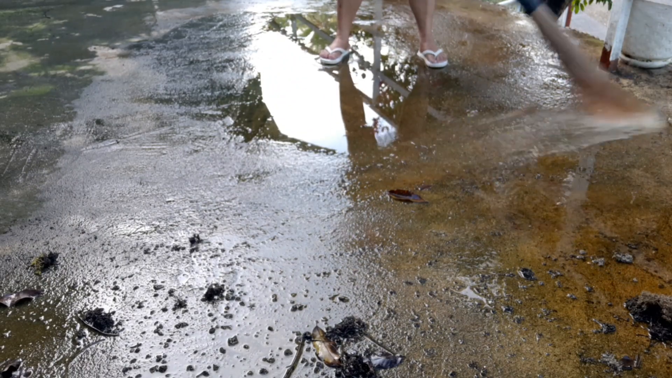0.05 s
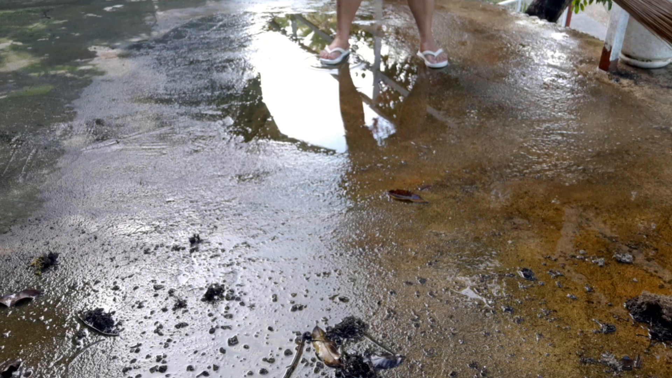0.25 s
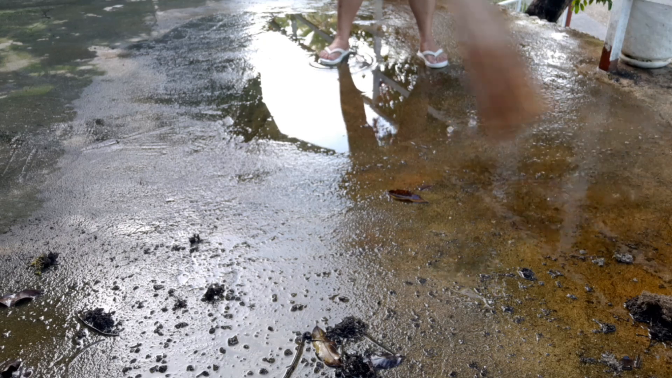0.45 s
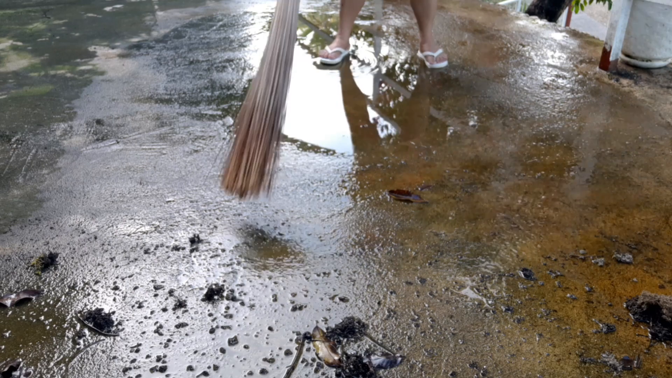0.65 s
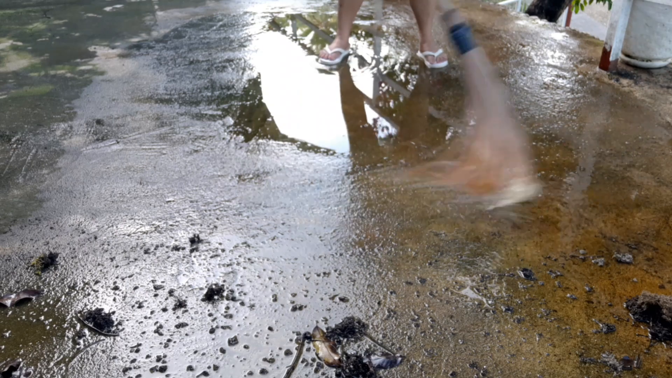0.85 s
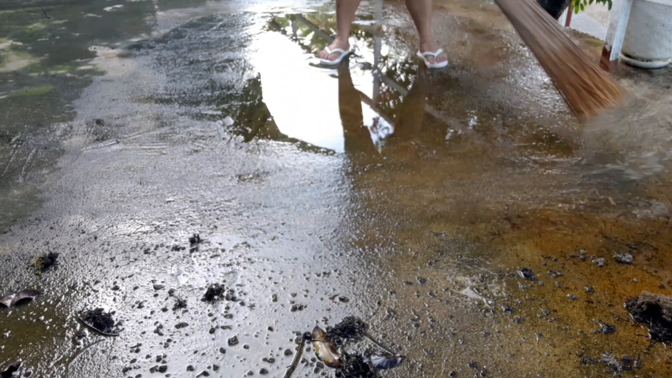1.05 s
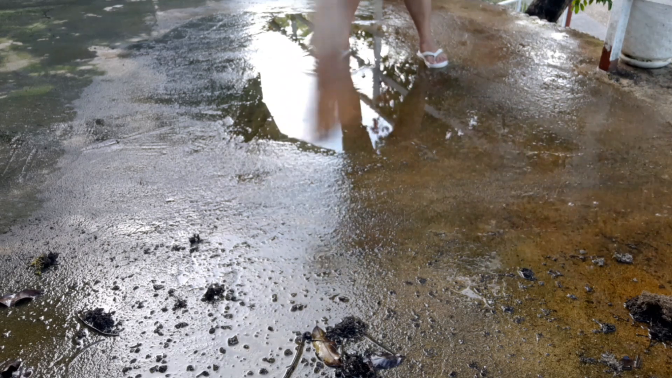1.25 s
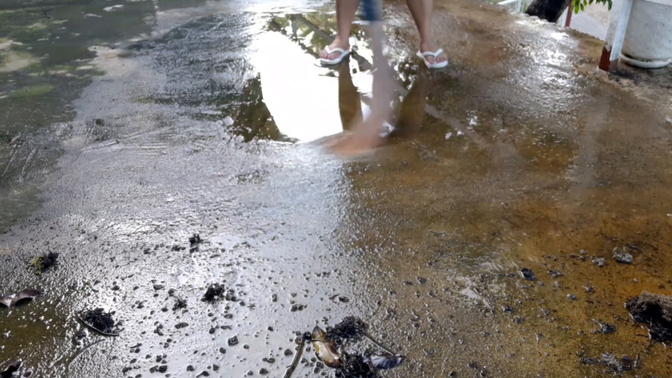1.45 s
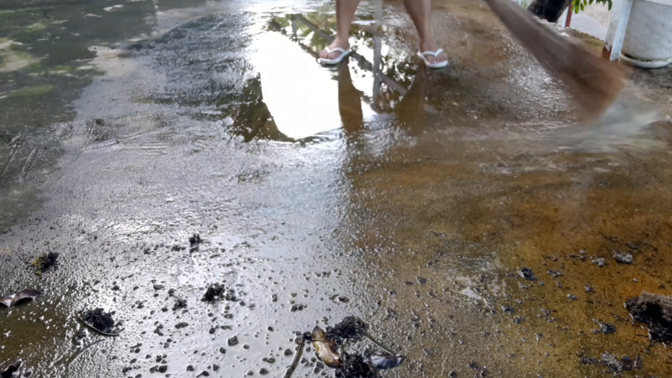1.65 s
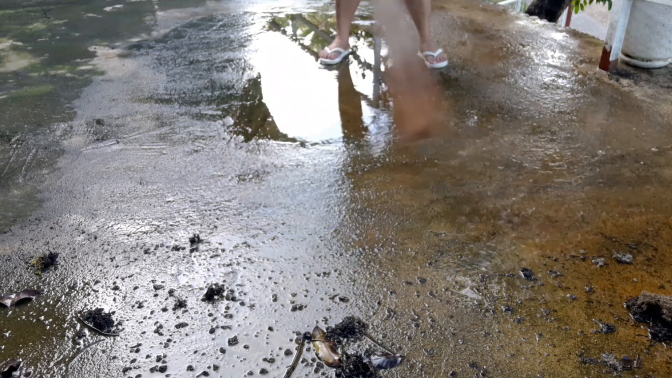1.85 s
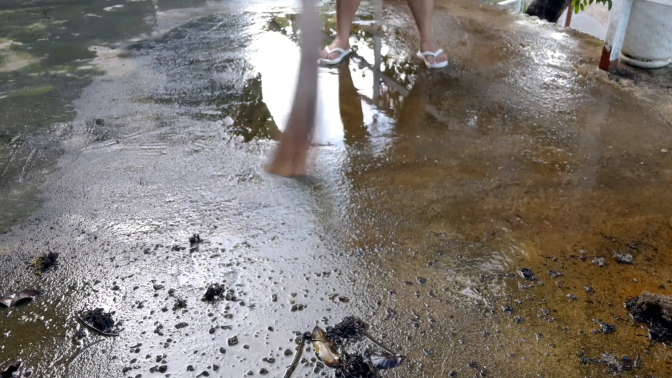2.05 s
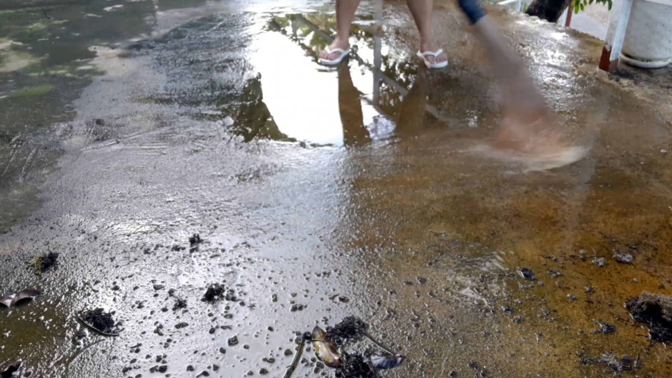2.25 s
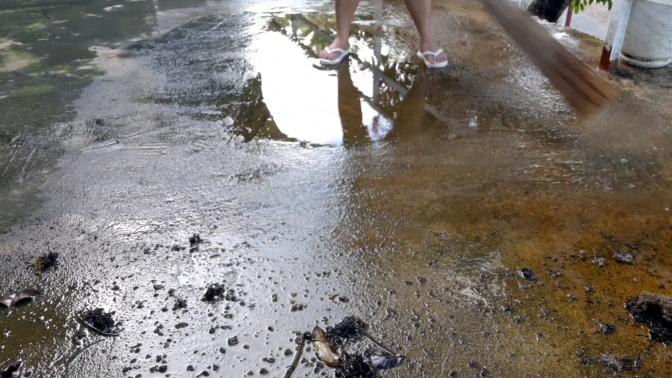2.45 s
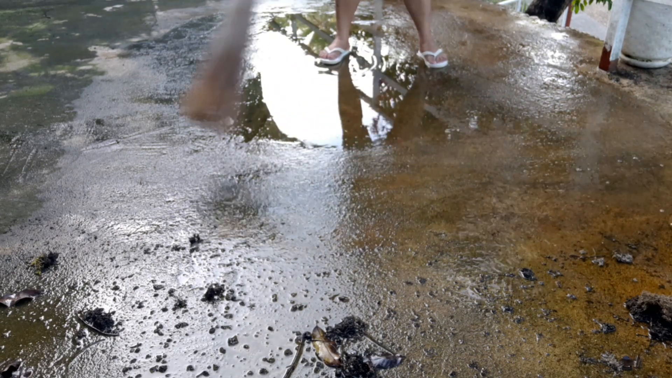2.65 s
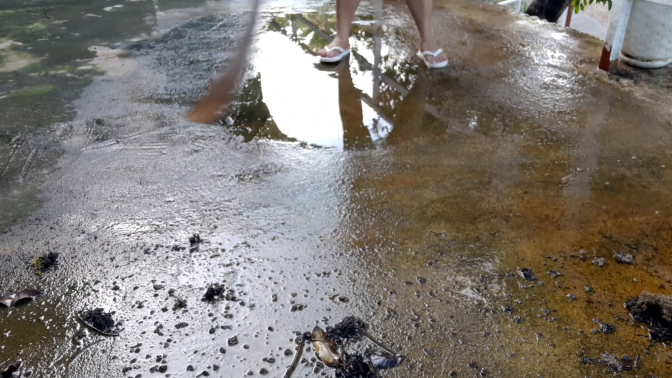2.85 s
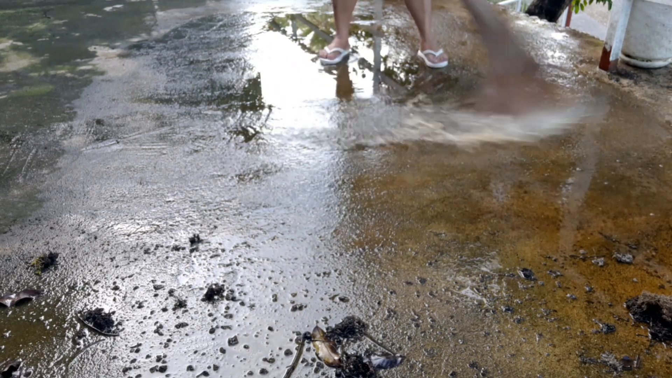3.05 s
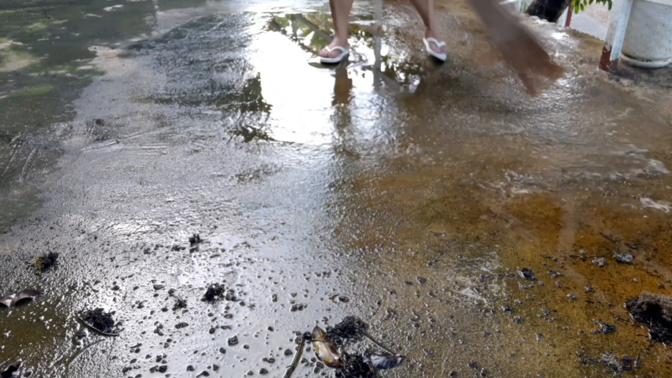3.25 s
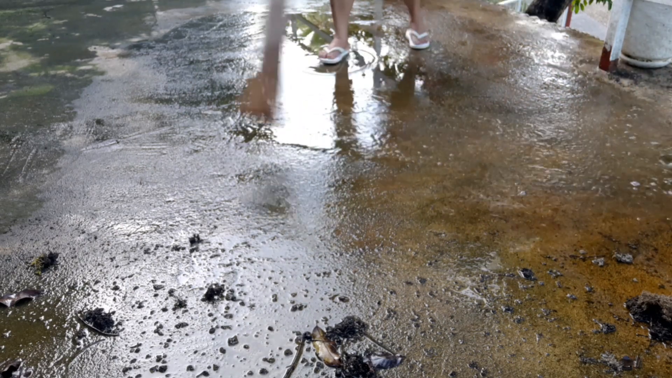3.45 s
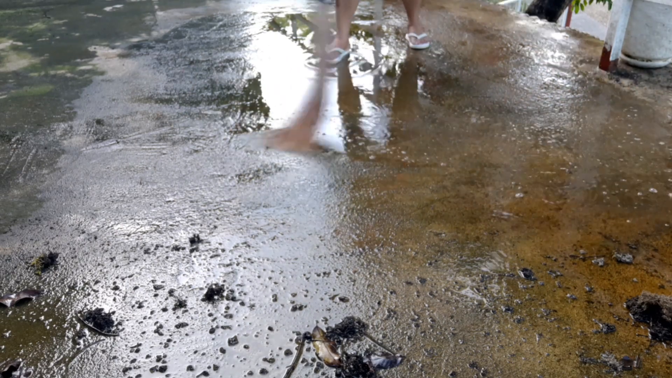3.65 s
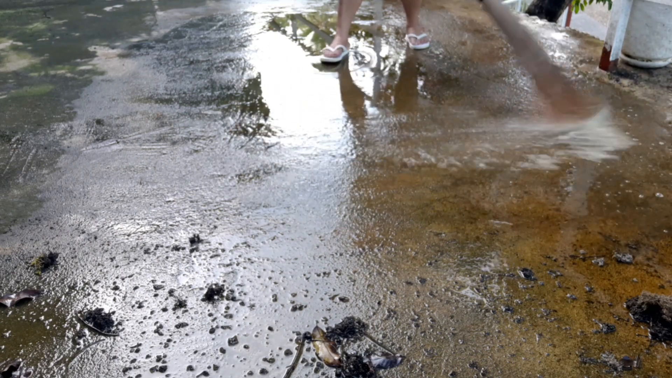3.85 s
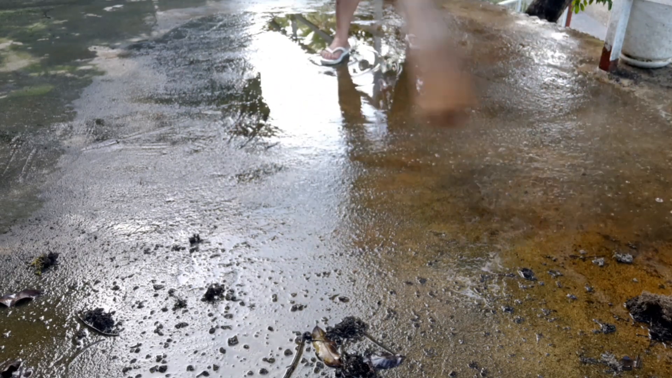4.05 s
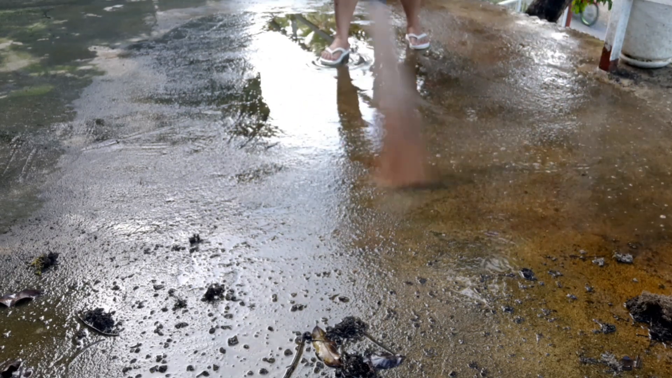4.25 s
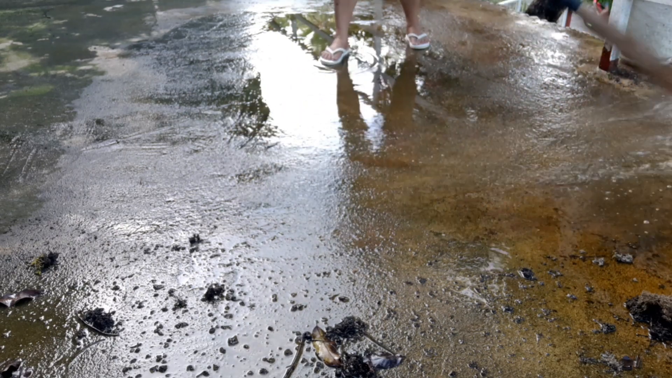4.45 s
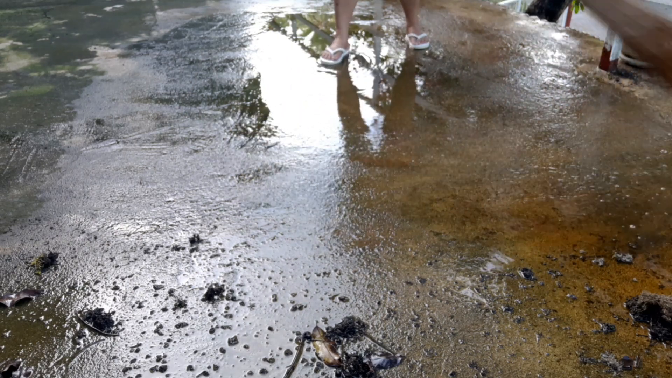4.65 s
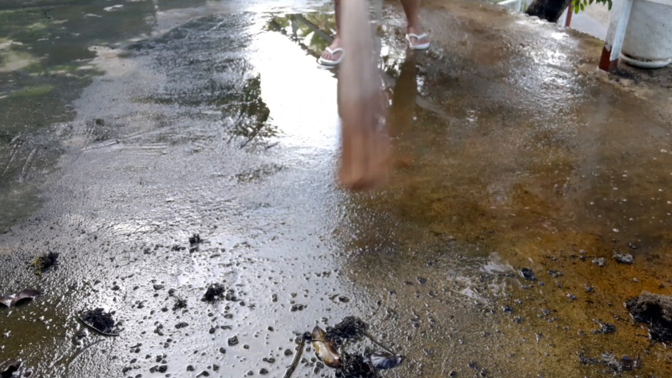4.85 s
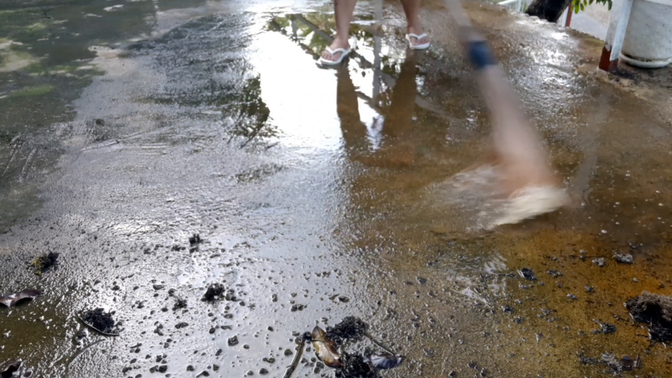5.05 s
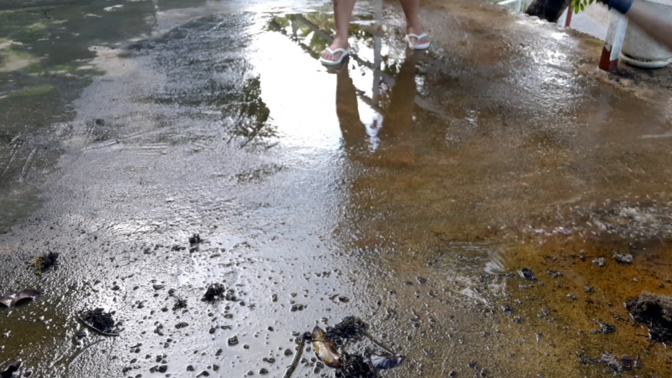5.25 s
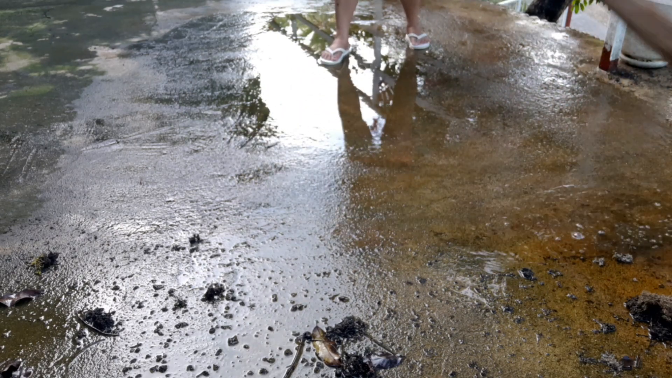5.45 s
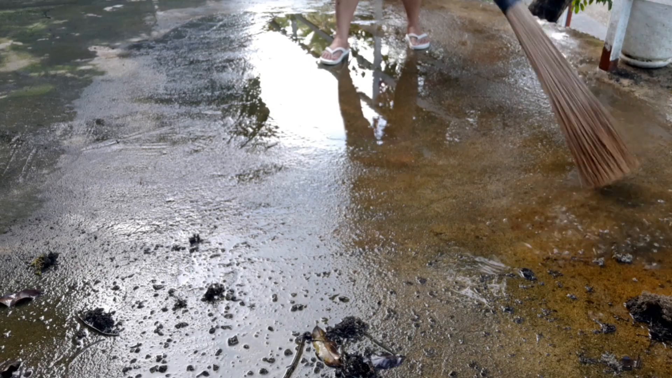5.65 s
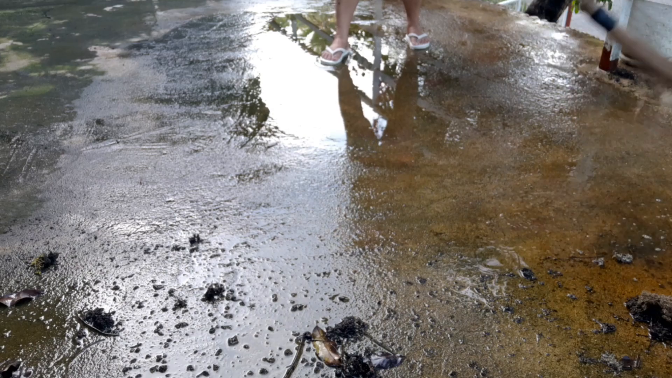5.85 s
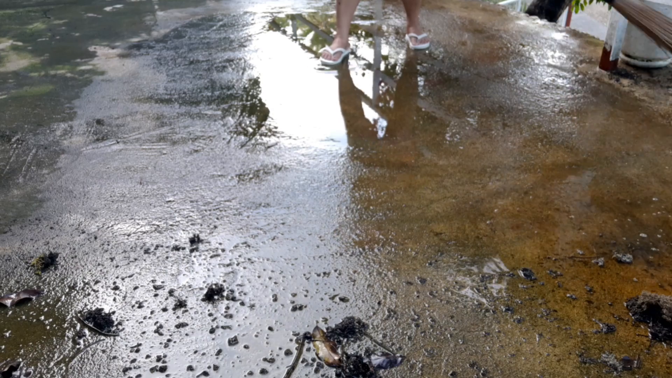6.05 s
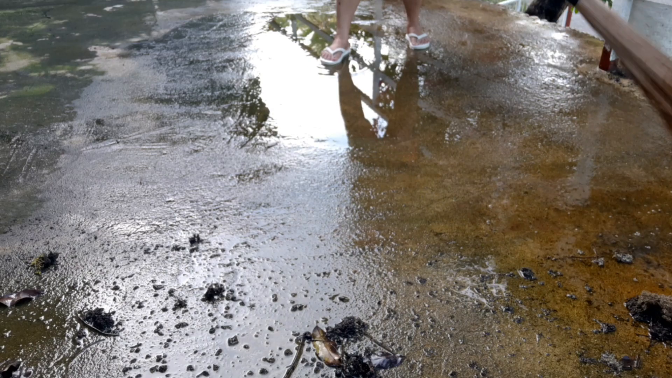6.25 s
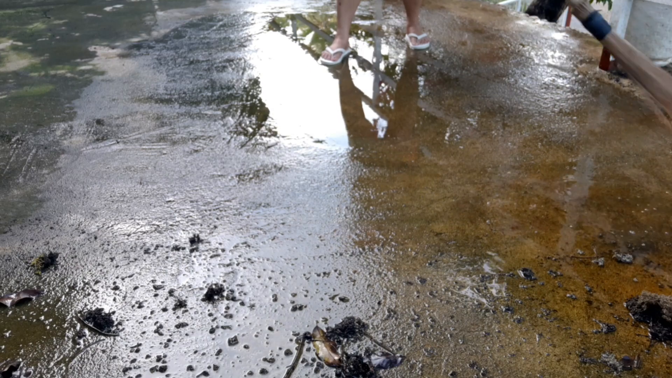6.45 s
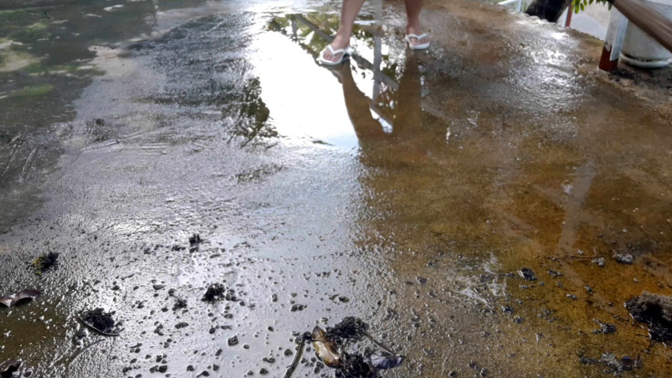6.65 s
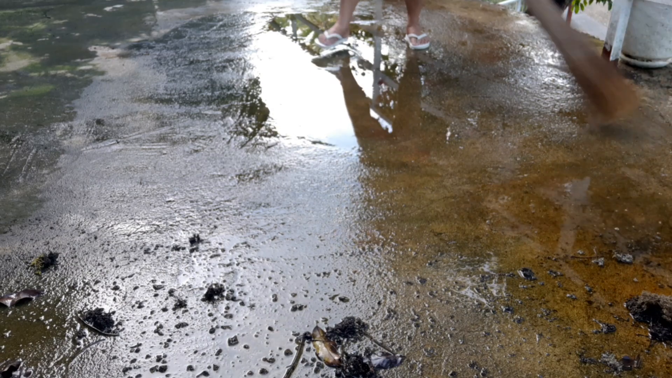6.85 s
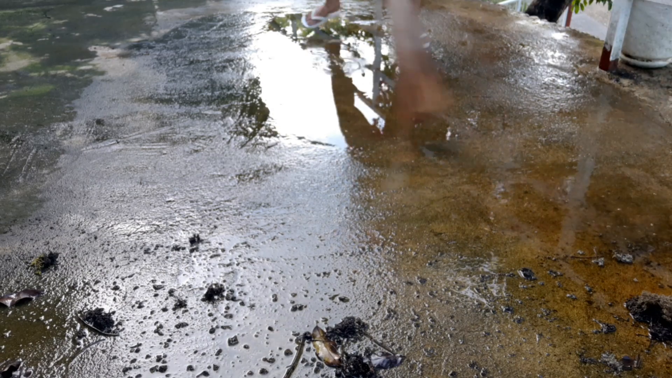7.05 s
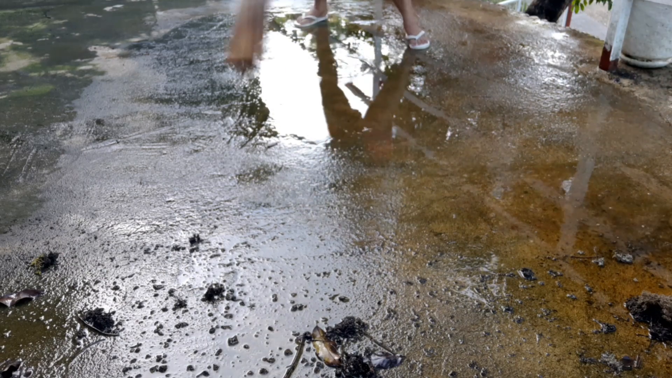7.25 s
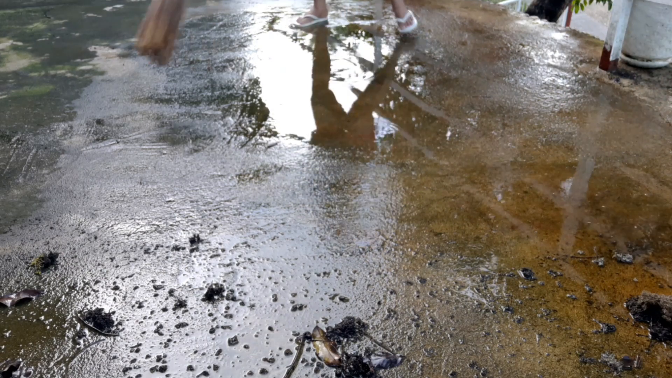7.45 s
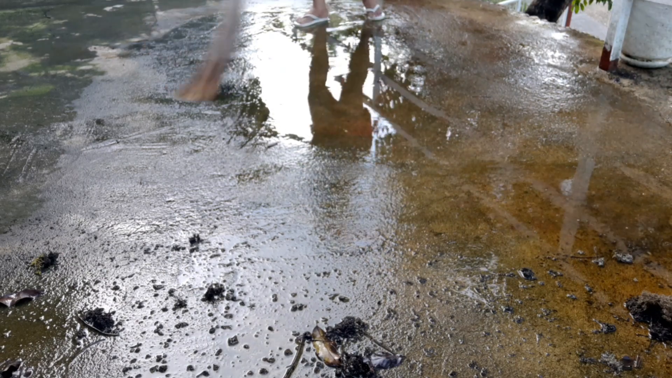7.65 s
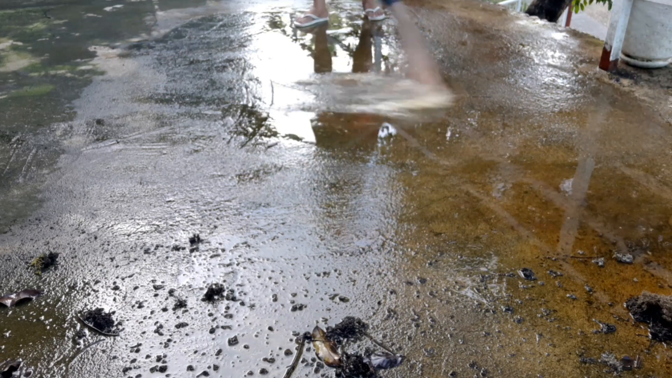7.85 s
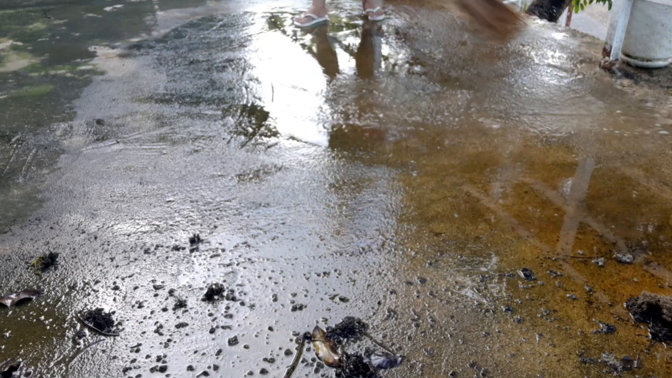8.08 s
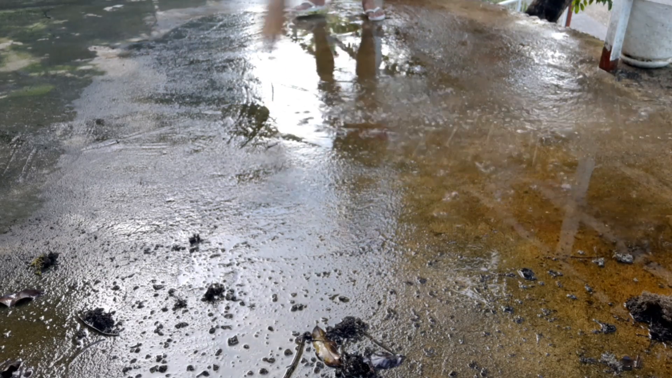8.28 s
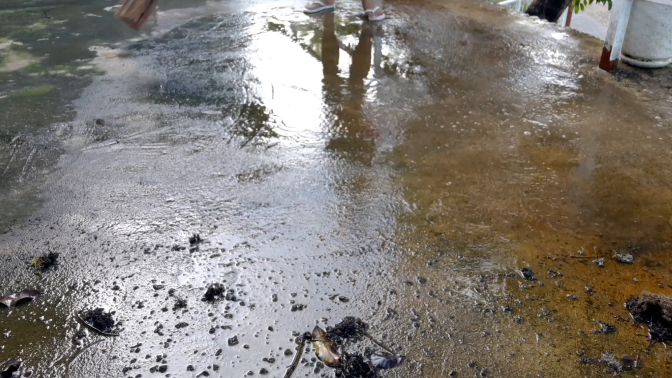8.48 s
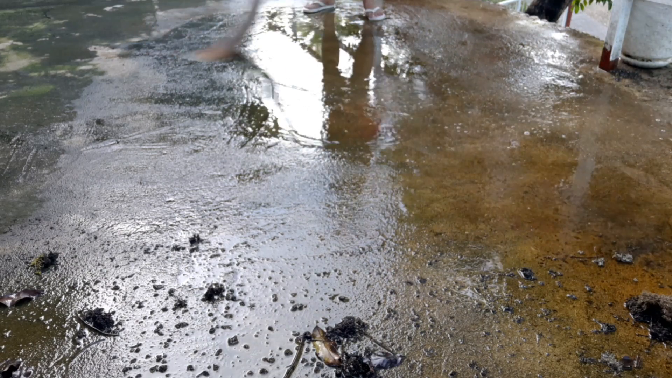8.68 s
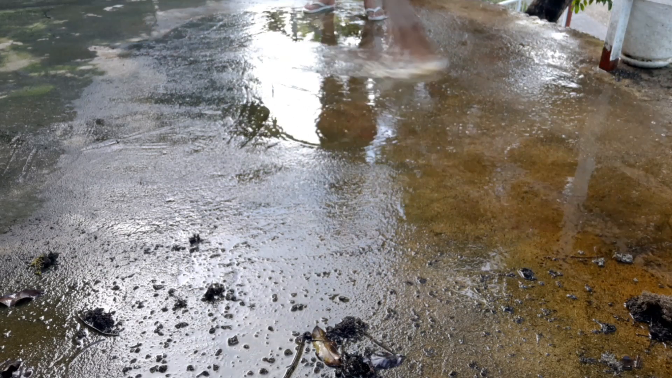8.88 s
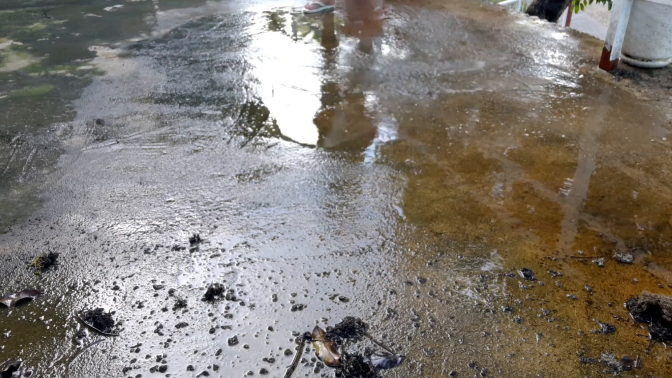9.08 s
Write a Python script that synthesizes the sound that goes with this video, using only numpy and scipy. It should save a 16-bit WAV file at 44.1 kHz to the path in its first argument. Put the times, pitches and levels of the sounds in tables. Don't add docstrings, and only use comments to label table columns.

```python
import sys
import numpy as np
from scipy import signal
from scipy.fft import rfft, irfft, next_fast_len
from scipy.io import wavfile
from scipy.ndimage import uniform_filter1d, map_coordinates

SR = 44100
rng = np.random.default_rng(int(sys.argv[2]) if len(sys.argv) > 2 else 0)


def generate_wav(signal):
    frames = np.transpose(np.atleast_2d(signal))
    scaled = np.clip(frames, -1, 1) * 32767
    pcm = np.round(scaled).astype(np.int16)
    wavfile.write(sys.argv[1], SR, pcm)


def volts_from_db(level):
    exponent = np.asarray(level, float) / 20
    return 10 ** exponent


N = 402190

# (frequency [Hz], density [dB per Hz])
MURMUR = [(120, -32), (200, -2), (300, -2.5), (600, -10.5), (900, -11.5), (1400, -20), (2500, -54)]
# (frequency [Hz], density [dB per Hz])
AIR = [(500, -30), (1400, 10), (4500, 7), (7300, 7), (8700, -15), (12000, -51), (15300, -33), (15700, -52)]
# (frequency [Hz], density [dB per Hz])
DEEP = [(15, -70), (25, -17), (43, -16), (64, -3), (95, 4), (115, -3), (170, -67)]
# (frequency [Hz], density [dB per Hz])
UPPER = [(70, -35), (100, 2.5), (130, 6), (155, 3), (185, -10.5), (400, -36), (900, -39.5)]
# (frequency [Hz], density [dB per Hz])
TYRES = [(410, -34), (700, -9), (1270, -4), (2400, -10.5), (3350, -10), (4500, -22), (5850, -51),
         (9900, -120)]
# (frequency [Hz], coherence [clipped to -1 to 1 once interpolated])
ALIKE = [(60, 0.99), (130, 0.95), (290, 0.75), (640, 0.97), (1410, -5.2), (3100, 0.59), (6820, 0.63),
         (15000, 0.97)]
# (time [s], level [dB])
TRAFFIC = [(0, 6.5), (.45, 3.5), (2.3, 0), (3.3, -0.5), (4.05, 0), (5.7, 5), (7.4, 1), (8.4, -5),
           (9.12, -10)]
# (time [s], level [dB])
PASSING = [(0, -47), (.6, -50.5), (2, -53), (3.3, -56), (8.6, -61), (9.12, -60)]
# (time [s], frequency [Hz], level [dB])
ENGINES = [
    [(2.2, 115.1, -44), (2.6, 114.1, -41), (3.05, 114.3, -42.5), (3.3, 110, -41)],
    [(3.4, 139.4, -43.5), (4.2, 146.8, -41), (4.8, 135, -61)],
    [(3.8, 121.4, -43), (4.3, 127, -39.5), (4.7, 124.7, -35.5), (5.15, 126, -44)],
    [(5.2, 147, -44), (5.8, 147.5, -40), (6.2, 142.7, -34), (6.7, 139, -49)],
    [(7.0, 131, -37), (7.35, 135, -37), (7.75, 125, -52)],
    [(7.8, 103, -38), (8.2, 100.3, -58), (8.9, 93.2, -41)],
]
# (time [s], frequency [Hz], level [dB], half length [s], tremble [share of pitch])
CHIPS = [(7.09, 4300, -61, .04, .035), (7.41, 3900, -54, .008, .03), (8.33, 4300, -52, .022, .02),
         (4.82, 4400, -58, .012, .03), (2.08, 1640, -58, .07, .005), (1.8, 1870, -57, .05, .005),
         (8.59, 2020, -58, .08, .045), (8.71, 1800, -54, .04, .04), (0.62, 2050, -61, .07, .04),
         (4.2, 2100, -57, .03, .03), (7.48, 1950, -59, .015, .03), (2.75, 2950, -60, .1, .01)]
# (frequency [Hz], decay time t60 [s])
REVERB = [(200, 0.44), (2000, 0.29), (12000, 0.16)]
# (time [s], level [dB], decay time t60 [s])
BUMPS = [
    (5.886, -35, .2),
    (5.956, -32, 0.57),
    (6.618, -35.5, 0.73),
]
# (frequency [Hz], width [Hz], level [dB])
TUB = [(210, 10.4, 3.5), (290, 30, -8), (333, 27, -14), (483, 14, -6.5), (603, 37, -11), (743, 22, -8),
       (860, 45, -13), (1130, 140, -10.5), (1450, 220, -14.5)]
# (time [s], cavity level [dB], cavity [Hz], cavity decay time t60 [s], crack re cavity
# before a shared 10 dB boost [dB])
SLAPS = [
    (0.6593, -39, 2030, 0.025, -16.5),
    (8.4173, -43, 1810, 0.022, 0),
    (8.43, -46, 2050, 0.039, 2),
    (8.449, -25, 1360, 0.013, -11),
    (8.456, -37, 1350, 0.031, -13),
    (8.4646, -40, 1060, 0.028, -7),
    (8.482, -42, 935, 0.023, -3),
    (8.5133, -42, 2130, 0.013, -9),
]
# (frequency [Hz], density [dB per Hz])
CRACK = [(1000, -3), (3500, 1), (7300, -8), (9000, -17), (16000, -13)]
# (frequency [Hz], density [dB per Hz])
SWISH = [(240, -72), (400, -43), (600, -29.5), (850, -25), (1300, -14.5), (2200, -5), (3700, -1),
         (5500, -3.5), (7250, -0.5), (7800, -6.5), (8500, -13.5), (11500, -10.5), (14500, -11.5),
         (16000, -14.5)]
# (touch [s], pressing down [s], full contact [s], scraping at its start [dB], at the lift [dB])
STROKES = [(-0.1, 0.17, 0.091, -16.5, -18.5), (0.757, 0.11, 0.14, -23.5, -22.5),
           (1.401, .11, .16, -25, -19.5), (2.066, 0.15, 0.15, -22, -20.5),
           (2.861, 0.11, 0.16, -28.5, -19.5), (3.661, 0.11, 0.15, -22, -20.5),
           (4.291, 0.11, .12, -18.5, -21.5), (4.981, 0.1, 0.18, -25, -23.5), (5.707, 0.14, 0.059, -17, -20),
           (6.374, 0.13, 0.091, -24, -22.5), (7.64, 0.16, 0.19, -20.5, -24), (8.655, 0.16, 0.14, -20, -23)]
# (touch level [dB], fading at the lift [dB per s], right microphone late at the start
# [samples], at the end [samples], extra spray [dB])
PATHS = [(-33.5, 272, 4, 11.7, -4), (-47, 319, -1.5, 11.2, 0.3), (-51.5, 330, -1.5, 8.2, -0.9),
         (-54.5, 279, 1, 10, 0.2), (-50.5, 250, -3, 7.3, 0.2), (-44.5, 380, -1.5, 9.8, -1.4),
         (-42.5, 290, 4, 13, 0), (-49.5, 286, 2.5, 14.7, -.5), (-45, 173, 10, 12.3, -1),
         (-54.5, 248, 11.5, 12.8, -2), (-59.5, 250, -3.5, 6.2, -2.5), (-51, 176, 0, 2.6, -0.2)]
# (slosh at full contact [dB], wave crest after the touch [s], crest level [dB],
# patter at the lift [dB], patter dying [dB per s])
WATER = [(-27, 0.22, -28, -34.5, 80), (-40, 0.2, -30.5, -38.5, 81), (-37.5, 0.19, -25.5, -37, 78),
         (-37, 0.23, -30, -39, 103), (-41.5, 0.18, -29, -27.5, 107), (-34, 0.14, -29.5, -40, 73),
         (-32.5, .15, -25, -37.5, 118), (-36.5, 0.15, -27, -39.5, 75), (-35, .19, -25, -27, 125),
         (-39, 0.17, -35, -35, 100), (-30.5, 0.28, -27, -35.5, 87), (-39, 0.21, -25.5, -46, 51)]
# (time [s], level [dB], half length [s])
FLICKS = [(1.176, -38, 0.0075), (4.064, -45, 0.0093), (5.645, -56.5, 0.011), (6.983, -55, 0.026),
          (7.428, -60, .02), (2.51, -48, 0.014), (3.317, -54, 0.011), (7.79, -34.5, 0.012),
          (8.192, -52, 0.011), (8.335, -55, .012), (8.39, -57, .008), (8.45, -52, 0.027),
          (8.517, -58, .015), (9.103, -40.5, 0.027)]


def unit(x):
    return x / np.sqrt(np.mean(x ** 2) + 1e-20)


def along(points, hz):
    f, v = np.transpose(points)
    return np.interp(np.log(hz + 1), np.log(f + 1), v)


def curves(rows):
    s, *columns = np.transpose(rows)
    return [np.interp(np.arange(N) / SR, s, column) for column in columns]


def wobble(rate):
    knots = rng.standard_normal(int(N * rate / SR) + 4)
    return map_coordinates(knots, [np.arange(N) * rate / SR])


def below(hz, edge_hz):
    return 1 / np.sqrt(1 + (hz / edge_hz) ** 8)


def rush(spectrum, alike, late=0):
    m = next_fast_len(N)
    hz = np.fft.rfftfreq(m, 1 / SR)
    a, b = rfft(rng.standard_normal((2, m))) * volts_from_db(along(spectrum, hz))
    turn = np.arccos(np.clip(along(alike, hz), -1, 1)) / 2
    mid, side = a * np.cos(turn), b * np.sin(turn)
    right = (mid - side) * np.exp(-2j * np.pi * hz * late / SR)
    return unit(irfft([mid + side, right], m)[:, :N])


def open_air():
    return volts_from_db(-58.5) * rush(AIR, [(1000, 0)])


def town():
    near_db = curves(TRAFFIC)[0]
    return volts_from_db(-52 + 0.13 * near_db) * rush(MURMUR, [(200, 0.95), (400, 0.72), (800, 0.033)])


def engines():
    notes, t = np.zeros(N), np.arange(N) / SR
    for rows in ENGINES:
        hz, db = curves(rows)
        fade = np.clip(np.minimum(t - rows[0][0], rows[-1][0] - t) / 0.069, 0, 1)
        level = volts_from_db(db - 2.0 + 0.34 * wobble(8))
        phase = 2 * np.pi * np.cumsum(hz + 0.72 * wobble(5)) / SR
        notes += fade * level * np.sin(phase)
    return notes


def traffic():
    near_db, tyre_db = curves(TRAFFIC) + curves(PASSING)
    deep = volts_from_db(-49 + 0.11 * near_db) * rush(DEEP, ALIKE, late=3.9)
    upper = volts_from_db(-45.5 + near_db) * rush(UPPER, ALIKE, late=4.0)
    tyres = volts_from_db(tyre_db + 3.5 * wobble(6.9)) * rush(TYRES, [(1000, 0.9)], late=18.3)
    return (engines() + deep + upper) * volts_from_db([[.8], [-.8]]) + tyres


def birds():
    t = np.arange(N) / SR
    tremble = np.cumsum(wobble(200)) / SR
    notes = np.zeros(N)
    for s, hz, db, half, share in CHIPS:
        envelope = volts_from_db(db) * np.exp(-((t - s) / half) ** 2)
        notes += envelope * np.sin(2 * np.pi * hz * (t + share * tremble))
    return notes


def yard(x):
    hz, t, z = signal.stft(rng.standard_normal((2, SR // 3)), SR, nperseg=256)
    decay = volts_from_db(-60 * t / along(REVERB, hz)[:, None])
    tail = signal.istft(z * decay, SR, nperseg=256)[1]
    return signal.fftconvolve(x, tail / np.linalg.norm(tail[0]), axes=1)[:, :N]


def tub_bumps():
    drum, t = np.zeros(N + SR), np.arange(SR // 2) / SR
    f = np.fft.rfftfreq(len(t), 1 / SR)
    tub = 0
    for k, (centre, width, db) in enumerate(TUB):
        mode = 1j * f * width / (centre * centre - f * f + 1j * f * width)
        tub = tub + (-1) ** k * volts_from_db(db) * mode
    for s, db, t60 in BUMPS:
        ring = unit(irfft(rfft(rng.standard_normal(len(t))) * tub, len(t)))
        attack = (1 - np.exp(-t / 0.0015)) * (1 + 0.51 * volts_from_db(-60 * t / 0.023))
        drum[round(s * SR):][:len(t)] += volts_from_db(db - 60 * t / t60) * ring * attack
    return np.array([drum[12:N + 12], drum[:N]])


def slaps():
    slap, t = np.zeros(N + SR), np.arange(SR // 2) / SR
    f = np.fft.rfftfreq(len(t), 1 / SR)
    for s, db, hz, t60, crack_db in SLAPS:
        noise = irfft(rfft(rng.standard_normal(len(t))) * volts_from_db(along(CRACK, f)), len(t))
        crack = volts_from_db(crack_db + 10 - 60 * t / 0.0032) * unit(noise)
        cavity = volts_from_db(-60 * t / t60) * np.sin(2 * np.pi * hz * t)
        slap[round(s * SR):][:len(t)] += volts_from_db(db) * (cavity + crack)
    return slap[:N]


def grains(level_db, late, low_hz, high_hz, count, width):
    fine = 4
    when, (size, sign, place) = rng.random(count), rng.standard_normal((3, count))
    at = (when * (N - 1)).astype(int)
    size = np.sign(sign) * volts_from_db(3 * np.clip(size, -2, 2))
    lag = late[at] + width * place
    m = next_fast_len(N + 4096)
    hz = np.fft.rfftfreq(m, 1 / SR)
    gain = volts_from_db(along(SWISH, hz)) * np.sqrt(1 - below(hz, low_hz) ** 2) * below(hz, high_hz)
    gain = gain / np.sqrt(np.mean(gain ** 2) * np.mean(size ** 2) * count / N)
    pair = []
    for way in (-1, 1):
        slot = np.clip(fine * (when * N + way * lag / 2), 0, None).astype(int)
        pair.append(np.bincount(slot, size * volts_from_db(level_db[at]), fine * m))
    return irfft(rfft(pair)[:, :m // 2 + 1] * gain, m)[:, :N]


def contact(u, k, touch_db, full_s, full_db, lift_db, patter_db):
    (_, press, hold, *_), (_, fade, *_) = STROKES[k], PATHS[k]
    *_, usual_patter_db, dying = WATER[k]
    lift = press + hold
    held_db = np.interp(u, [0, *full_s, lift, lift + 1], [touch_db, *full_db, lift_db, lift_db - fade])
    held_db = held_db + 0.5 * np.sin(np.pi * np.clip((u - press) / hold, 0, 1))
    after = np.clip(u - lift, 0, None)
    patter = volts_from_db(2 * (patter_db - dying * after))
    trickle = volts_from_db(2 * (patter_db - usual_patter_db - 63 - 10 * after))
    landing = np.clip(u / 0.018, 1e-4, 1) ** 2
    return landing * volts_from_db(2 * held_db) + (u > lift) * (patter + trickle)


def stroke(u, k):
    _, press, hold, start, end = STROKES[k]
    touch, *_, extra = PATHS[k]
    wave, crest_s, crest, patter, _ = WATER[k]
    crest_s = np.clip(crest_s, press + .01, press + hold - .01)
    wave_touch, wave_lift, wave_patter = touch - 1.5, crest - 5.5, patter - 7
    slosh = contact(u, k, wave_touch, [0.51 * press, press, crest_s], [wave_touch + 2, wave, crest],
                    wave_lift, wave_patter)
    pull = -0.39 * extra + 0.19 * (crest - (start + end) / 2 + 10.5)
    drag = contact(u, k, touch - 7.5, [press], [start - 3 + pull], end - 1.9 + pull, patter - 0.5)
    scrape = contact(u, k, touch, [press], [start], end, patter)
    full = start - 3 + extra
    spray = contact(u, k, touch + 1, [0.74 * press, press], [full - 2.5, full], end - 2.5 + extra, patter + 1)
    deep, away = crest - 11, -11 - 0.5
    gurgle = contact(u, k, wave_touch + away, [press, crest_s], [wave + away, deep],
                     wave_lift + away, wave_patter + away)
    return [slosh, drag, scrape, spray, gurgle]


def patchy(x, patchy_db):
    z = signal.stft(x, nperseg=256)[2]
    field = uniform_filter1d(rng.standard_normal(z.shape[1:]), size=3, axis=0)
    field = unit(uniform_filter1d(field, size=7, axis=1))
    return signal.istft(z * unit(volts_from_db(patchy_db * field)), nperseg=256)[1][:, :N]


def crossing():
    start, press, hold = np.transpose(STROKES)[:3]
    first, last = np.transpose(PATHS)[2:4]
    moments = [start - .03, start + .05, start + press + hold + .04]
    return np.interp(np.arange(N) / SR, np.ravel(moments, "F"), np.ravel([first, first, last], "F"))


def broom():
    t, power = np.arange(N) / SR, np.zeros((5, N))
    for k, (touch_s, *_) in enumerate(STROKES):
        power += stroke(t - touch_s, k)
    flick_db = np.array([[-8], [-4], [0], [1.5], [-15]])
    for s, db, half in FLICKS:
        power += volts_from_db(2 * db) * np.exp(-((t - s) / half) ** 2) * volts_from_db(2 * flick_db)
    shared_db = 1.2 * wobble(55)
    own_db = np.array([depth * wobble(25) for depth in (0.98, 1.46, 0.27, 1.4, 2.0)])
    slosh_db, drag_db, scrape_db, spray_db, gurgle_db = 10 * np.log10(power) + shared_db + own_db
    late = crossing()
    slosh = grains(slosh_db, late, 950, 1900, count=40000, width=3.7)
    slosh = slosh + grains(gurgle_db, late, 100, 1040, count=20000, width=8.7)
    drag = grains(drag_db, late, 2350, 5150, count=70000, width=3.5)
    scrape = grains(scrape_db, late, 3900, 11600, count=100000, width=1.5)
    spray = grains(spray_db, late, 9130, 16800, count=160000, width=1.0)
    water = slosh * volts_from_db([[.45], [-.45]]) + spray * volts_from_db([[.9], [-.9]])
    return water + (drag + scrape) * volts_from_db([[.1], [-.1]])


def scene():
    near = patchy(broom(), patchy_db=1.39) + tub_bumps() + slaps() + birds()
    return near + volts_from_db(-12.5) * yard(near) + traffic() + town() + open_air()


def low_pass(x):
    return signal.sosfilt(signal.butter(12, 16510, fs=SR, output="sos"), x)


def record(dry):
    kept = irfft(rfft(dry) * (np.fft.rfftfreq(N, 1 / SR) < 15800), N)
    return low_pass(kept)


dry = scene()
out = record(dry)
generate_wav(out)
```